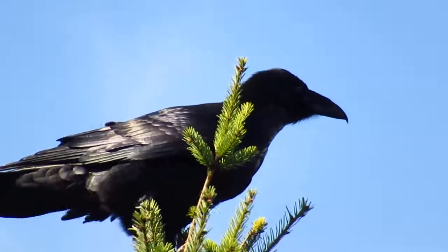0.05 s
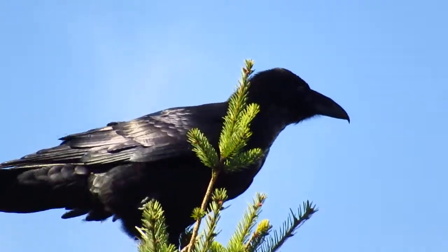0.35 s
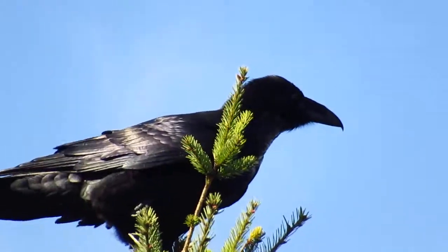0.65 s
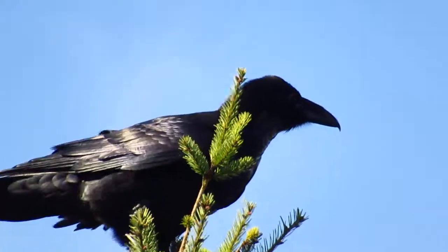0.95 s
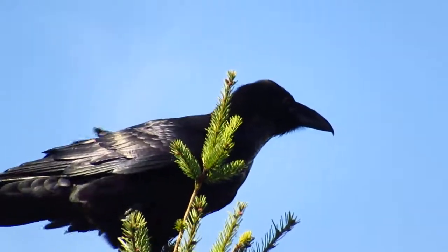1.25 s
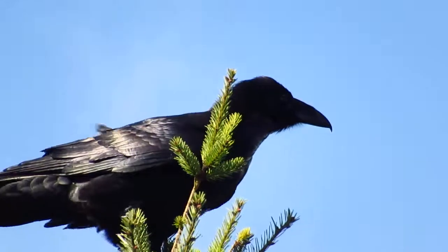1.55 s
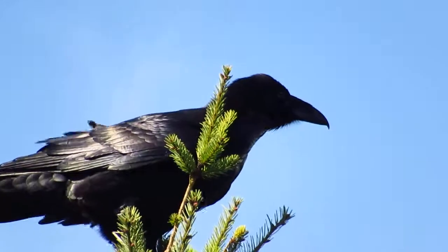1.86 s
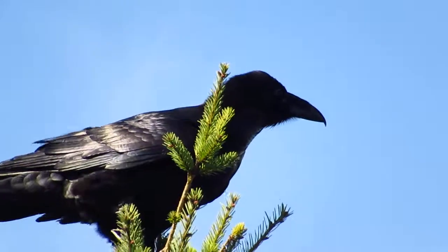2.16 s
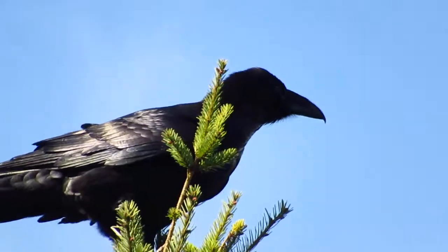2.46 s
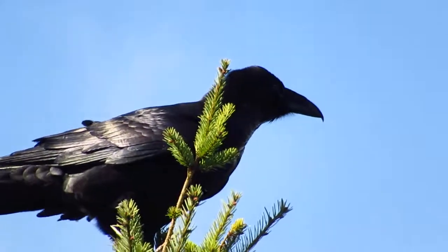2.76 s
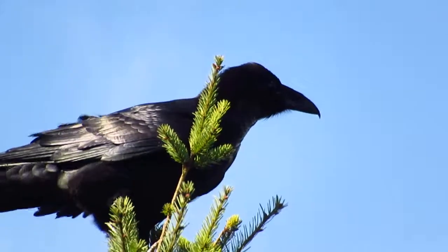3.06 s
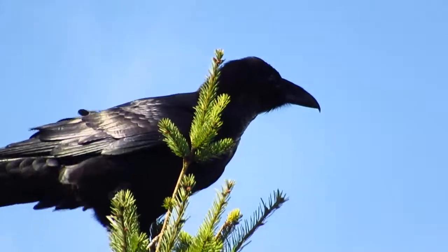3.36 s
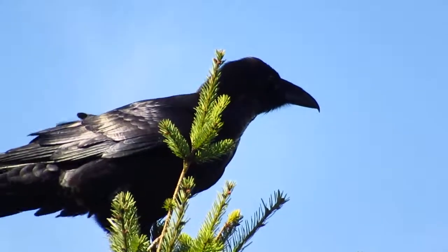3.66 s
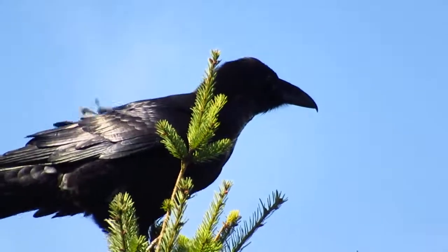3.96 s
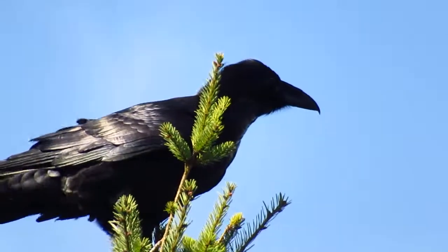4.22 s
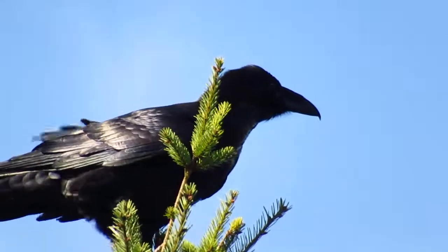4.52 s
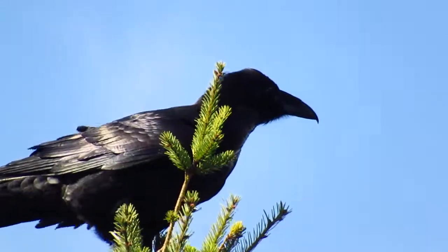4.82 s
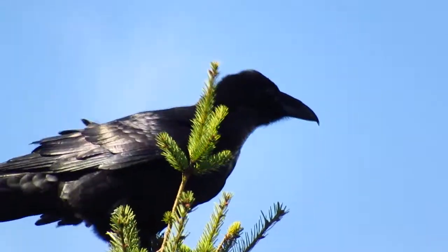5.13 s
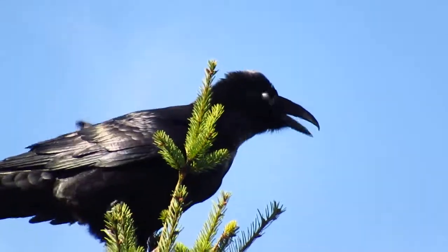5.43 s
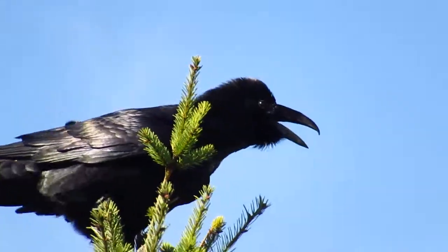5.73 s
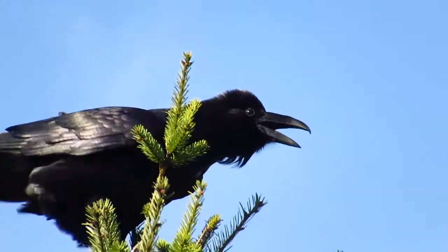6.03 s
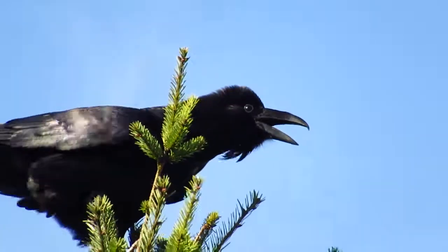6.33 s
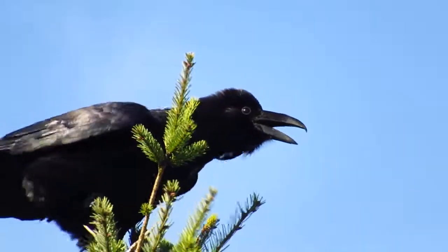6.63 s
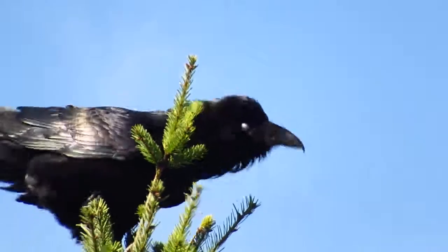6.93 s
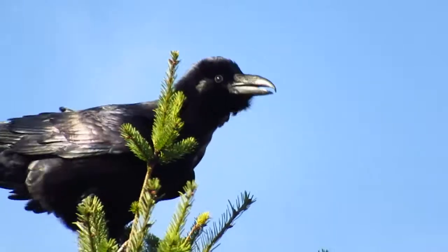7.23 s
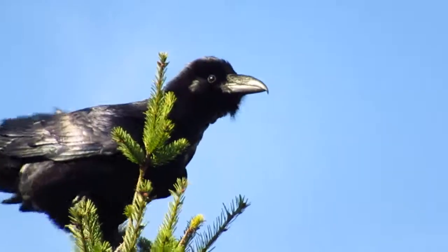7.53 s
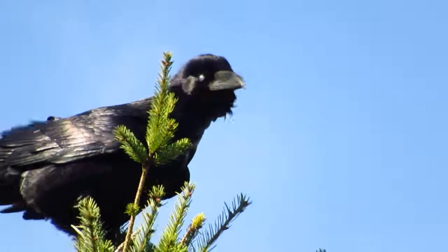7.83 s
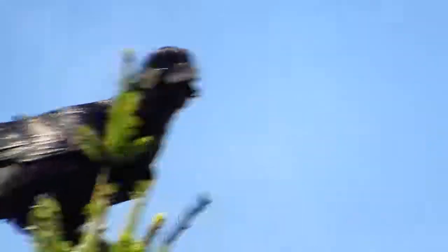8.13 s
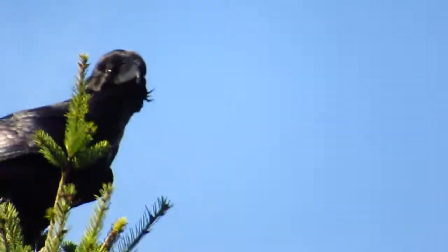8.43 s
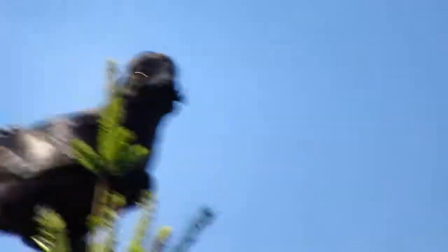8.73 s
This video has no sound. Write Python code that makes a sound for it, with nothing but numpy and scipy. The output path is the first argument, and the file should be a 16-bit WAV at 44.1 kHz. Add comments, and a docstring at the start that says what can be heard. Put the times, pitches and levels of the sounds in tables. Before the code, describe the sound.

From the start, wind roars softly and steadily in distant forest. Gusts rumble on the microphone with irregular low thumps, over a faint hiss, and this continues for the whole nine seconds or so. At about 6 seconds a raven gives a soft run of nine short, hollow knocks, all at nearly the same middle pitch: four evenly spaced, a tiny pause, then five more, ending around 6.8 seconds. The ground and trees add a slight, short echo. At 7 seconds the bird snaps its bill shut with a quick, dry double click. From about 7.7 seconds a sleeve rustles faintly, peaking near 8.5, and a hand makes a few brief scuffs on the camera between 8 and 8.5 seconds. The strongest wind thumps land near 7.9 and 8.4 seconds, as the distant roar swells slightly.

```python
"""A raven on a spruce top gives a soft run of nine hollow knocks, then snaps its bill shut.
Each knock is a push of air ringing the throat; ground and trees echo the bird.
Air in distant forest roars steadily; wind rumbles and its eddies thump on the hissing microphone.
Near the end the camera shifts in the hand: a sleeve rustles, skin scuffs the casing."""
import sys
import numpy as np
from scipy import signal
from scipy.fft import rfft, irfft
from scipy.io import wavfile
from scipy.ndimage import uniform_filter1d

SR = 44100
rng = np.random.default_rng(int(sys.argv[2]) if len(sys.argv) > 2 else 0)


def file_out(sig):
    """Save sig as 16-bit WAV at sys.argv[1]."""
    # one column per channel
    cols = np.atleast_2d(sig).T
    # limit, then scale
    lim = np.clip(cols, -1, 1)
    pcm = np.round(lim * 32767).astype(np.int16)
    wavfile.write(sys.argv[1], SR, pcm)


N = 387198
TIME_S = np.arange(N) / SR

# far roar: f/Hz, level/dB
ROAR_SPECTRUM = [(30, 1.5), (150, -5), (300, -6), (430, -4.5), (560, -3), (690, 1.5), (850, -.5), (1100, 0),
                 (1400, -3), (1900, -7), (2700, -14.5), (4000, -26.5), (7000, -40), (15000, -51)]
# far roar: t/s, relative level/dB
ROAR_ENVELOPE = [(0.0, -47), (.7, -46.5), (2.2, -47), (3.3, -46), (5.4, -46.5), (7.1, -46), (8.78, -43.5)]
# roar brightness as air stirs the needles: t/s, tilt/(dB/octave)
ROAR_TILT = [(0, -0.1), (2.5, -0.5), (4, 0.8), (6, 0.86), (7.5, -0.1), (8.7, -0.7)]
# gusts at the microphone: t/s, half width/s, relative level/dB
WIND_GUSTS = [(0.127, 0.07, -30.5), (0.393, 0.037, -39), (0.981, 0.029, -35), (1.126, .05, -30),
              (1.54, 0.047, -37.5), (1.678, 0.057, -38.5), (2.12, 0.034, -45), (2.446, 0.06, -41.5),
              (2.703, 0.068, -44), (2.937, 0.032, -35.5), (3.05, 0.029, -38), (3.306, 0.022, -37.5),
              (3.42, 0.024, -35.5), (3.65, .04, -45), (4.43, 0.075, -38.5), (4.807, 0.029, -43),
              (5.103, 0.045, -40.5), (5.315, 0.04, -38), (5.51, 0.029, -44), (5.79, .05, -43),
              (5.97, 0.064, -35.5), (6.268, 0.056, -34.5), (6.632, 0.029, -33.5), (6.805, 0.027, -36),
              (7.017, 0.023, -40), (7.16, 0.062, -39), (7.48, 0.064, -42), (7.656, 0.032, -33),
              (7.958, 0.066, -29), (8.64, .08, -36.5)]
# breeze rumble: f/Hz, level/dB
RUMBLE_SPECTRUM = [(10, -27), (25, -1), (42, -1.5), (80, 1.5), (130, -4.5), (200, -17), (300, -25),
                   (500, -49), (1000, -66)]
# strongest eddies: t/s, relative level/dB, centre f/Hz
STRONG_EDDIES = [(.098, -20.5, 95), (.149, -20.5, 88), (.218, -24, 102), (.41, -28, 79), (.963, -25, 159),
                 (1.115, -21, 142), (1.134, -20, 185), (1.146, -17, 130), (1.241, -21, 82),
                 (1.541, -18.5, 151), (1.565, -16, 195), (1.732, -24, 143), (2.421, -22.5, 119),
                 (2.458, -21, 95), (2.693, -23, 74.6), (3.468, -26.5, 100), (4.163, -35.5, 112),
                 (4.399, -15, 131), (4.42, -19.5, 164), (4.456, -14.5, 168), (4.485, -20.5, 123),
                 (4.826, -25, 94.5), (5.086, -27, 91), (5.791, -20.5, 89), (5.842, -24, 109),
                 (5.94, -23.5, 185), (6.202, -22.5, 118), (6.238, -14, 167), (6.27, -19, 134),
                 (6.602, -22, 124), (6.797, -18, 268), (6.952, -27.5, 156), (7.107, -16, 116),
                 (7.425, -28.5, 118), (7.885, -11.5, 156), (7.935, -18.5, 146), (7.95, -26, 170),
                 (7.978, -24, 109), (8.034, -20.5, 86), (8.232, -22.5, 114), (8.441, -12, 141),
                 (8.616, -22, 148), (8.708, -18.5, 126)]
# throat knocks: t/s, level/dB, f/Hz, swell/s
RAVEN_KNOCKS = [(6.0008, -34.5, 964, .001), (6.0867, -31, 990, .0015), (6.1736, -30, 977, .003),
                (6.2558, -35, 960, .001), (6.445, -27, 963, 0.0027), (6.5025, -28.5, 970, 0.0025),
                (6.559, -32.5, 990, .002), (6.6695, -29, 976, 0.0018), (6.7249, -29, 977, .0005)]
# air pop opening a knock: f/Hz, level/dB
POP_SPECTRUM = [(250, -13), (550, 4), (850, -1), (1300, -2), (2000, -22), (2900, -22), (5000, -37)]
# tree echo decay: f/Hz, t60/s
TREE_DECAY = [(300, .16), (1000, 0.085), (4000, 0.043), (12000, .02)]
# bill shutting, tip first: t/s, tick level/dB, ring level/dB
BILL_SNAPS = [(6.9826, -35, -46), (7.0023, -32, -35)]
# hollow bill modes: f/Hz, relative level/dB, t60/s
BILL_MODES = [(655, 1, 0.023), (1170, -9, .022), (2120, -1, .016), (2590, 2, 0.011), (3900, -6, 0.013),
              (8200, -11, .004), (10500, -11, 0.015), (13600, -10, .007)]
# horn-on-horn tick: f/Hz, level/dB
TICK_SPECTRUM = [(500, -14), (2000, 0), (4500, -3), (8000, 6), (10500, -8), (15000, -5)]
# sleeve rustle: t/s, level/dB
SLEEVE_ENVELOPE = [(7.7, -66), (8.0, -61), (8.2, -59), (8.4, -64), (8.49, -56), (8.545, -52.5),
                   (8.6, -56.5), (8.78, -63)]
# sleeve rustle: f/Hz, level/dB
SLEEVE_SPECTRUM = [(500, -10), (1200, -5.5), (2600, 4), (3000, 0), (3500, 0), (4200, -9), (6500, -7.5),
                   (10000, -14), (15000, -24)]
# hand scuffs: t/s, half width/s, casing level/dB, skin level/dB
HAND_SCUFFS = [(7.987, 0.0036, -37, -49), (8.139, 0.0013, -35.5, -66), (8.384, 0.0056, -45, -52),
               (8.437, 0.0071, -41.5, -53), (8.445, 0.0052, -41.5, -57)]
# rubbed casing: f/Hz, level/dB
CASING_SPECTRUM = [(600, -19), (1000, -10), (1250, 2), (1600, 3), (1900, -3), (2600, -14), (3600, -21),
                   (5000, -35)]
# slipping skin: f/Hz, level/dB
SKIN_SPECTRUM = [(3000, -18), (5500, -7), (6800, -2.5), (8000, 2.5), (9300, -7), (10500, -2.5),
                 (12500, -16), (15000, -20)]
# microphone hiss: f/Hz, level/dB
HISS_SPECTRUM = [(100, 12.5), (3000, 2.5), (5000, 1), (7500, 1), (10000, -2), (12500, -5), (15000, -9)]


def gain(db):
    """Decibels to amplitude."""
    return 10 ** (np.asarray(db) / 20)


def unit_rms(x):
    """Scale to rms 1."""
    return x / np.sqrt(np.mean(x ** 2) + 1e-20)


def at_hz(table, hz):
    """Interpolate over log frequency."""
    table_hz, value = np.transpose(table)
    return np.interp(np.log(hz + 1), np.log(table_hz + 1), value)


def at_time(table, t=TIME_S):
    """Interpolate over time."""
    return np.interp(t, *np.transpose(table))


def add(mix, start_s, sound):
    """Mix in place from start_s."""
    part = mix[max(round(start_s * SR), 0):][:len(sound)]
    part += sound[:len(part)]


def noise(spectrum):
    """Coloured noise, rms 1."""
    hz = np.fft.rfftfreq(N, 1 / SR)
    return unit_rms(irfft(rfft(rng.standard_normal(N)) * gain(at_hz(spectrum, hz)), N))


def drift(rate_hz):
    """Random fluctuation up to about rate_hz, rms 1."""
    hz = np.fft.rfftfreq(N, 1 / SR)
    return unit_rms(irfft(rfft(rng.standard_normal(N)) * np.exp(-(hz / rate_hz) ** 2), N))


def forest_roar(trim_db=1, patchy_db=0.1, pivot_hz=900):
    """Air moving through distant forest: faintly patchy, brighter when it stirs."""
    hz, t, bands = signal.stft(noise(ROAR_SPECTRUM), SR, nperseg=1024)
    patches = uniform_filter1d(rng.standard_normal(bands.shape), size=10, axis=0)
    patches = unit_rms(uniform_filter1d(patches, size=8, axis=1))
    octaves = np.log2(np.maximum(hz, pivot_hz) / pivot_hz)[:, None]
    colour_db = patchy_db * patches + octaves * at_time(ROAR_TILT, t)
    air = signal.istft(bands * gain(colour_db), SR, nperseg=1024)[1][:N]
    return gain(at_time(ROAR_ENVELOPE) + trim_db) * unit_rms(air)


def breeze_db(calm_db=-50.5):
    """Wind strength at the microphone: bell-shaped gusts over a calm draught."""
    gust_power = sum(gain(db) ** 2 * np.exp(-((TIME_S - peak_s) / half_s) ** 2)
                     for peak_s, half_s, db in WIND_GUSTS)
    return 10 * np.log10(gain(calm_db) ** 2 + gust_power)


def wind_rumble(trim_db=-1.5, lumps_db=3.0):
    """Small turbulence follows the breeze, in lumps."""
    turbulence = noise(RUMBLE_SPECTRUM) * gain(lumps_db * drift(rate_hz=23))
    return gain(breeze_db() + trim_db) * unit_rms(turbulence)


def small_eddies(per_s=22, over_db=4, spread_db=3, ref_hz=105, ref_db=-33, db_per_octave=30,
                 spread_octaves=0.2, count=300):
    """Randomly shed eddies, stronger and higher in a gust. Rows: t/s, relative level/dB, f/Hz."""
    times_s = (np.arange(count) + rng.random(count)) / per_s
    size, speed = rng.standard_normal((count, 2)).T
    db = np.interp(times_s, TIME_S, breeze_db()) + over_db + spread_db * size
    hz = ref_hz * 2 ** ((db - ref_db) / db_per_octave + spread_octaves * speed)
    return list(np.transpose([times_s, db, hz])[times_s < TIME_S[-1]])


def eddy_thumps(eddies, steepness=3.26, trim_db=-1, wake_db=-14, wake_cycles=1.3):
    """Each eddy: one lopsided pressure swing within a short flutter of like-sized eddies."""
    out, t = np.zeros(N), np.arange(-SR // 16, SR // 16) / SR
    bins_hz = np.fft.rfftfreq(len(t), 1 / SR)
    for centre_s, db, hz in eddies:
        pulse = (1 - 2j * np.pi * hz * t / (steepness + 1)) ** -(steepness + 1)
        swing = (pulse * np.exp(2j * np.pi * rng.random())).real
        white = rfft(rng.standard_normal(len(t)))
        flutter = unit_rms(irfft(white * bins_hz * np.exp(-2 * bins_hz / hz), len(t)))
        wake = gain(wake_db) * flutter * np.exp(-.5 * (t * hz / wake_cycles) ** 2)
        thump = gain(db + trim_db) * (swing + wake) * signal.windows.tukey(len(t), .5)
        add(out, centre_s + t[0], thump[centre_s + t >= 0])
    return out


def throat_knocks(push_s=0.0058, ring_t60_s=0.041, sag=0.022, overtone_db=-30,
                  pop_db=-12, pop_t60_s=0.021, roughness=0.093):
    """A push of air pops and swells the throat's one resonance, which rings out and sags in pitch."""
    out, t = np.zeros(N), np.arange(SR // 10) / SR
    air, waver = noise(POP_SPECTRUM), drift(rate_hz=200)
    decay = gain(-60 * np.maximum(t - push_s, 0) / ring_t60_s)
    glide = 1 + sag * (np.exp(-t / push_s) - .5)
    for start_s, db, hz, swell_s in RAVEN_KNOCKS:
        span = round(start_s * SR) + np.arange(len(t))
        envelope = (1 - np.exp(-2 * t / swell_s)) * decay * (1 + roughness * waver[span])
        phase = 2 * np.pi * np.cumsum(hz * glide) / SR
        tone = envelope * np.sin(phase) + gain(overtone_db) * envelope ** 2 * np.sin(2 * phase)
        pop = air[span] * gain(pop_db - 60 * t / pop_t60_s)
        add(out, start_s, gain(db) * (tone + pop))
    return out


def tree_echo(x, delay_s=.012, level_db=-10, taps_per_s=3000):
    """Branch scatter: sparse taps of random sign, treble dying first."""
    taps = rng.choice([-1., 1.], SR // 2) * (rng.random(SR // 2) < taps_per_s / SR)
    hz, t, bands = signal.stft(taps, SR, nperseg=256)
    decay = gain(-60 * t / at_hz(TREE_DECAY, hz)[:, None])
    tail = signal.istft(bands * decay, SR, nperseg=256)[1]
    knock_hz = RAVEN_KNOCKS[0][2]
    knock_band = abs(np.fft.rfftfreq(SR, 1 / SR) - knock_hz) < 100
    tail /= np.sqrt(np.mean(abs(rfft(tail, SR)[knock_band]) ** 2))  # unity gain in this band
    out = np.zeros(N)
    add(out, delay_s, signal.fftconvolve(x, tail)[:N])
    return gain(level_db) * out


def ground_bounce(x, delay_s=.0165, level_db=-16, cutoff_hz=2200):
    """One close reflection; soft ground absorbs the treble."""
    lowpass = signal.butter(2, cutoff_hz, fs=SR, output="sos")
    out = np.zeros(N)
    add(out, delay_s, gain(level_db) * signal.sosfilt(lowpass, x))
    return out


def bill_snaps(tick_t60_s=0.0025, chatter_db=-17, chatter_t60_s=0.016):
    """Each snap: a dry tick, brief chatter of the two edges, ring of the hollow bill."""
    out, t = np.zeros(N), np.arange(SR // 25) / SR
    ring = sum((-1) ** k * gain(db - 60 * t / t60_s) * np.sin(2 * np.pi * hz * t)
               for k, (hz, db, t60_s) in enumerate(BILL_MODES))
    envelope = gain(-60 * t / tick_t60_s) + gain(chatter_db - 60 * t / chatter_t60_s)
    for start_s, tick_db, ring_db in BILL_SNAPS:
        tick = noise(TICK_SPECTRUM)[:len(t)] * envelope
        add(out, start_s, gain(tick_db) * tick + gain(ring_db) * ring)
    return out


def sleeve_rustle(grain_db=2):
    """Cloth sliding on cloth: faint, uneven."""
    friction = noise(SLEEVE_SPECTRUM) * gain(grain_db * drift(rate_hz=390))
    return gain(at_time(SLEEVE_ENVELOPE)) * unit_rms(friction)


def hand_scuffs(grain_db=2):
    """Skin slips on the camera with a grainy hiss and sounds the casing."""
    casing_gain, skin_gain = np.zeros(N), np.zeros(N)
    for peak_s, half_s, casing_db, skin_db in HAND_SCUFFS:
        stroke = np.exp(-.5 * ((TIME_S - peak_s) / half_s) ** 2)
        casing_gain += gain(casing_db) * stroke
        skin_gain += gain(skin_db) * stroke
    friction = casing_gain * noise(CASING_SPECTRUM) + skin_gain * noise(SKIN_SPECTRUM)
    return friction * unit_rms(gain(grain_db * drift(rate_hz=560)))


def scene():
    """Raven with echoes, camera handling and wind; mono."""
    raven = throat_knocks() + bill_snaps()
    echoes = ground_bounce(raven) + tree_echo(raven)
    handling = hand_scuffs() + sleeve_rustle()
    wind = forest_roar() + wind_rumble() + eddy_thumps(STRONG_EDDIES + small_eddies())
    return (raven + echoes + handling + wind)[None]


def record(dry, hiss_db=-57, cutoff_hz=15100):
    """Microphone hiss, then the band limit."""
    hiss = gain(hiss_db) * noise(HISS_SPECTRUM)
    lowpass = signal.firwin(1023, cutoff_hz, window=("kaiser", 9), fs=SR)
    return signal.oaconvolve(dry + hiss, lowpass[None], "same")


dry = scene()
out = record(dry)
file_out(out)
```